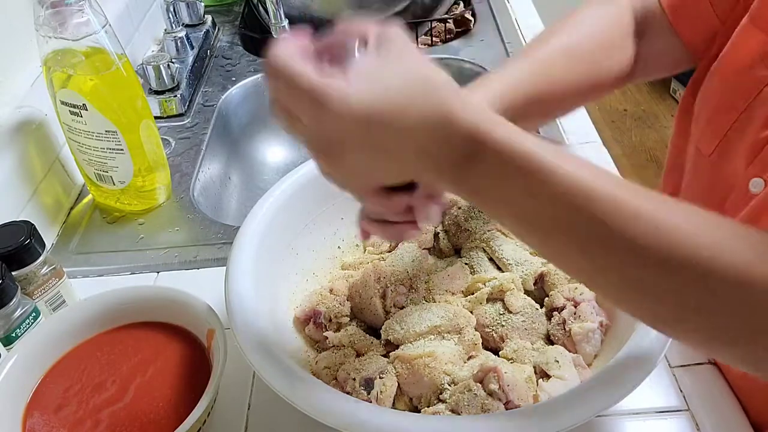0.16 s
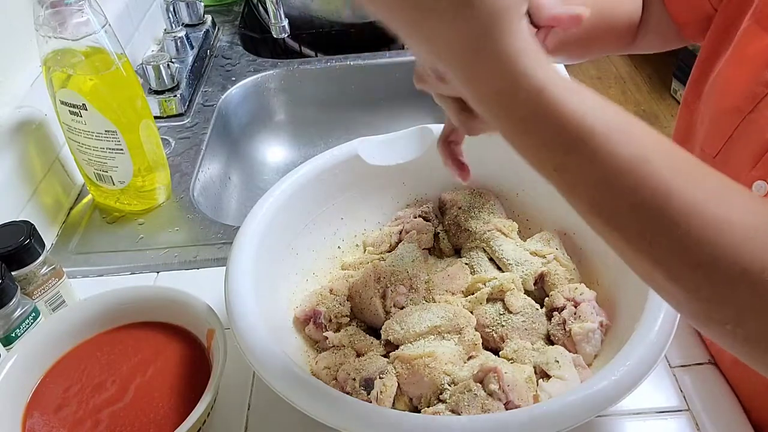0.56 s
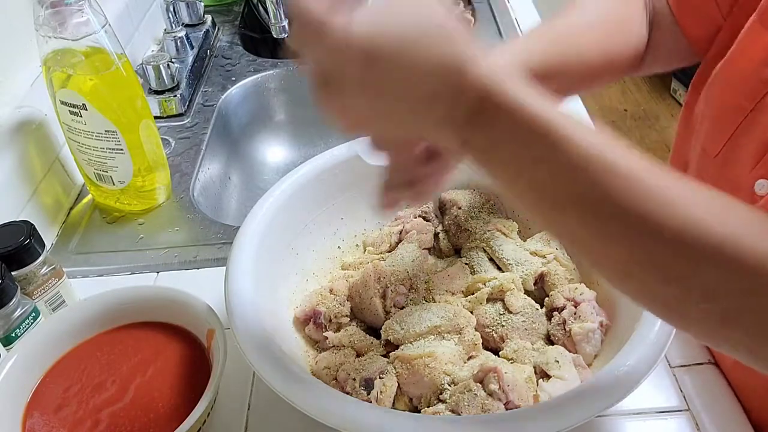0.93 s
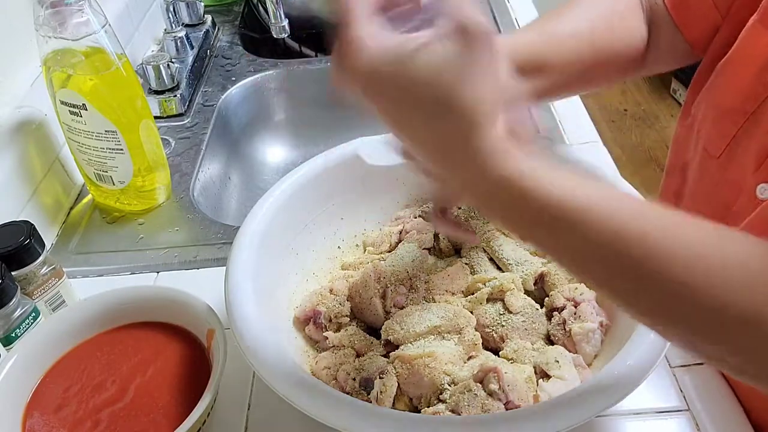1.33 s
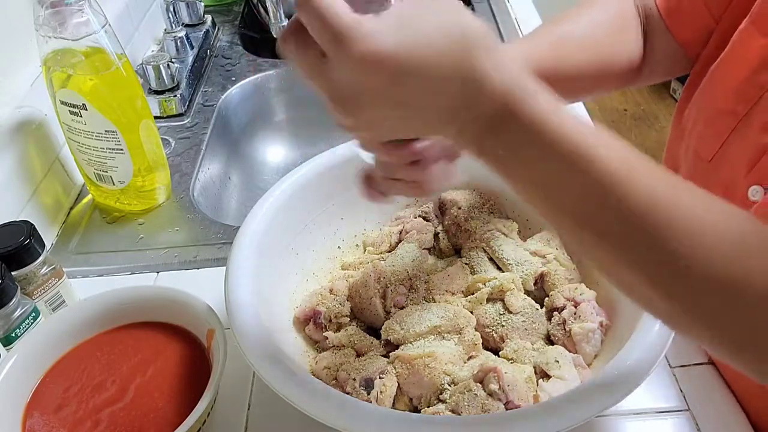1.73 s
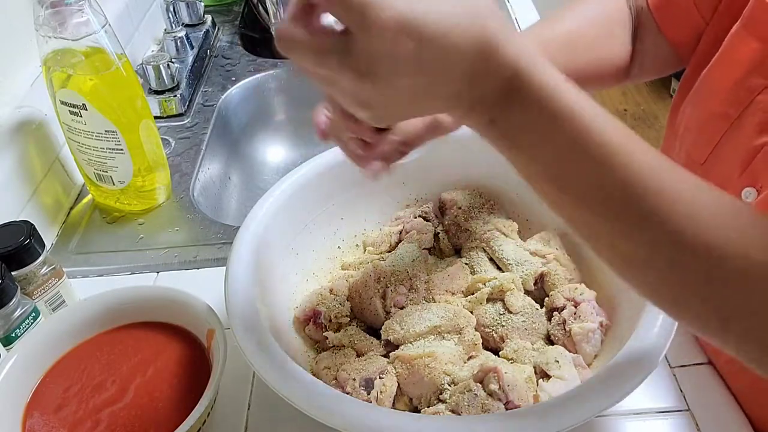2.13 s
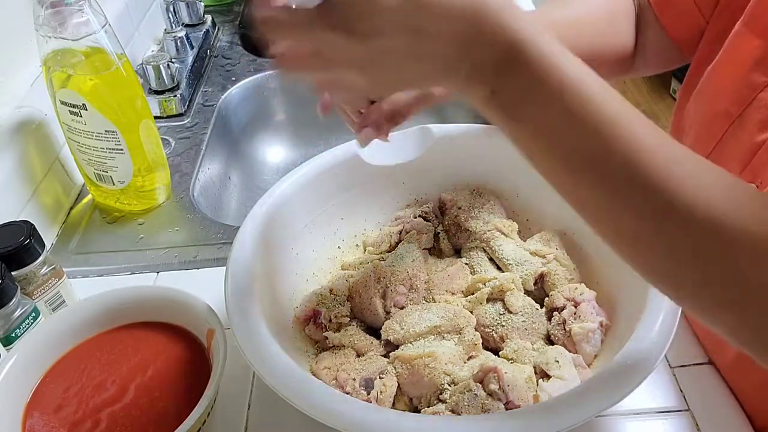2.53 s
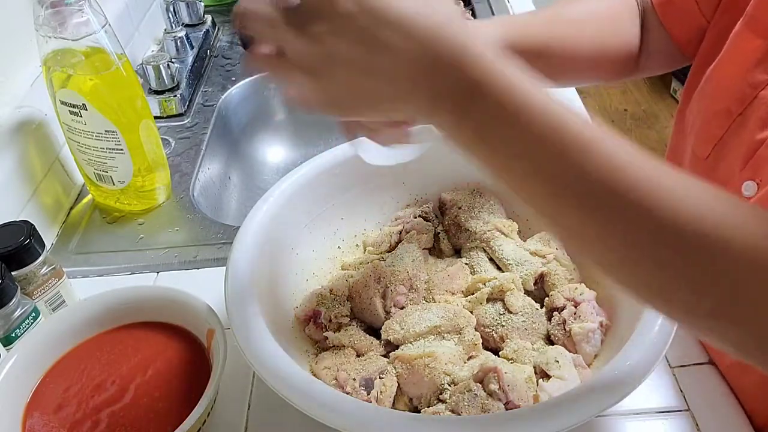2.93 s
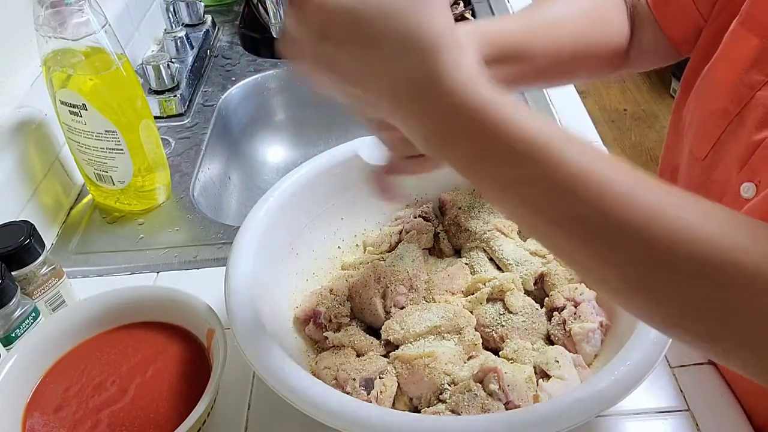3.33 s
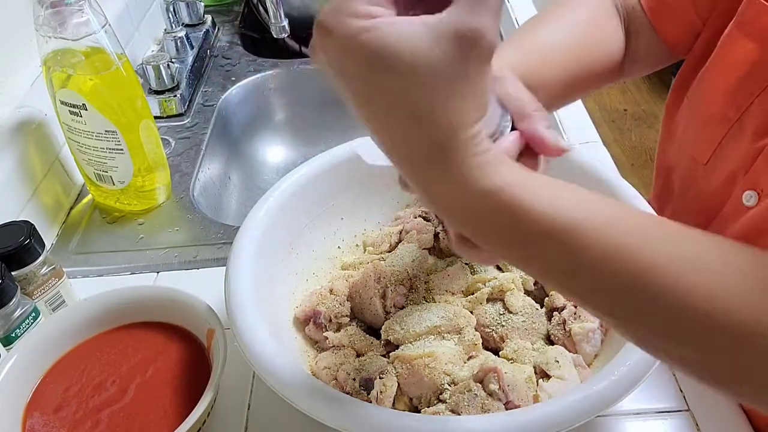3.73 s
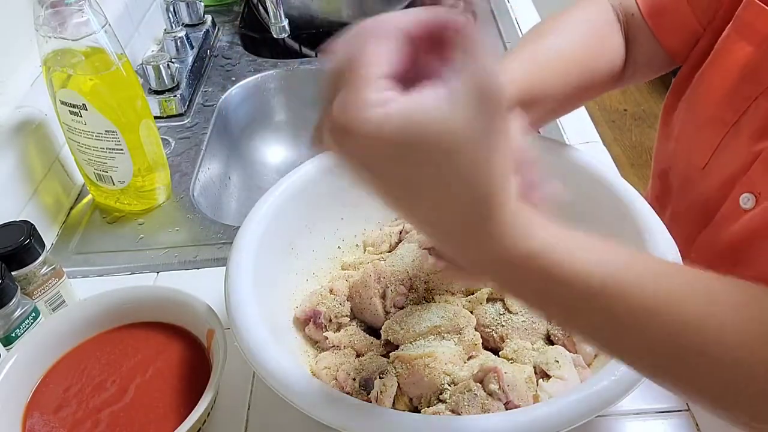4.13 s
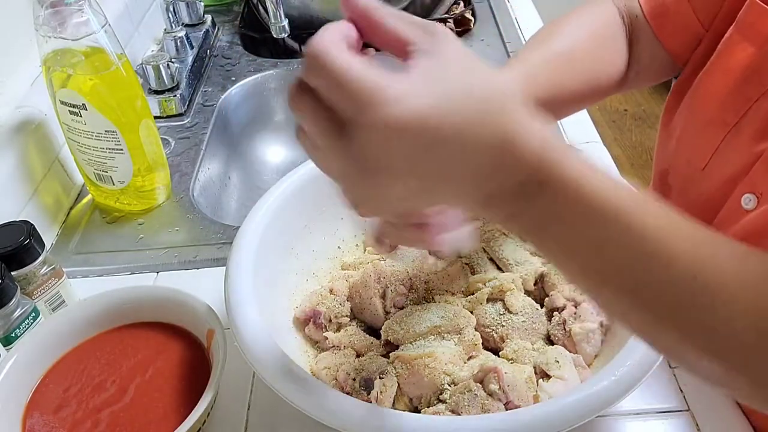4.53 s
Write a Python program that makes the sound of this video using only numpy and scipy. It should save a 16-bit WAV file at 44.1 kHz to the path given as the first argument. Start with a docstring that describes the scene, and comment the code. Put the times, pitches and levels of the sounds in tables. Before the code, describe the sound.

Two hands twist a spice grinder about twice a second, crunching grains between sharp clicks, while an appliance hums.

```python
"""Coarse grains crack in a seasoning grinder, twisted by two hands over a bowl of raw chicken.
After a few scattered cracks the twisting runs at about two turns a second. The burr crunches and
cracks grains, which rings the grinder's body. Between turns the hand takes a new grip with a click,
and loose grains rush across the jar and back. A small tiled kitchen answers, over an appliance's hum."""
import sys
import numpy as np
from scipy import signal
from scipy.fft import rfft, irfft
from scipy.io import wavfile
from scipy.ndimage import map_coordinates

SR = 44100
rng = np.random.default_rng(int(sys.argv[2]) if len(sys.argv) > 2 else 0)


def generate_wav(signal):
    """Clip the signal to [-1, 1] and save it as 16-bit WAV at the path in sys.argv[1]."""
    frames = np.transpose(np.atleast_2d(signal))
    scaled = np.clip(frames, -1, 1) * 32767
    pcm = np.round(scaled).astype(np.int16)
    wavfile.write(sys.argv[1], SR, pcm)


N = 205933
T = np.arange(N) / SR

# Levels are relative, ahead of layer and room gains.
# appliance hum partials: f/Hz, level/dB
HUM_PARTIALS = [(59.6, -56), (119.3, -57), (238.8, -78), (357, -79)]
# appliance rumble: f/Hz, level/dB
RUMBLE_SPECTRUM = [(15, -23.5), (33, 3), (45, -16.5), (60, -5.5), (75, 1), (86, -10), (98, 5), (112, 7.5),
                   (124, 1.5), (135, -20), (160, -17.5), (300, -50)]
# room air: f/Hz, level/dB
AIR_SPECTRUM = [(100, -6), (230, -1), (380, 0), (600, -5), (1200, -11), (3000, -17), (6500, -27),
                (15000, -32)]
# grinder knocking on the hand: t/s, level/dB, f/Hz, t60/s
HAND_KNOCKS = [(0.131, -45.5, 267, 0.08), (0.983, -51.5, 272, 0.089), (2.724, -41.5, 296, 0.033),
               (2.729, -43, 383, 0.07)]
# fine seasoning trickling as the grinder moves: t/s, level/dB
TRICKLE_CURVE = [(0, -63), (.5, -72), (.65, -90), (1.22, -65), (1.35, -52.5), (4.67, -48)]
# seasoning shifting as the jar is tipped or jolted: t/s, level/dB, length/s
JAR_JOLTS = [(0.083, -49, 0.059), (0.338, -54, 0.11), (0.85, -70.5, .06), (0.935, -50.5, 0.08),
             (1.088, -46, 0.025), (1.514, -32.5, 0.0068)]
# sliding grains: f/Hz, level/dB
SLIDE_SPECTRUM = [(300, -28.5), (900, -24), (1800, -15.5), (2600, -12.5), (3400, 0), (5000, -1.5),
                  (7000, 2), (9000, -3), (12000, -1.5), (15500, -7.5)]
# new grips: t/s, click/dB, click brightness/dB, rush across/dB, its length/s, rush back/dB
GRIPS = [(1.5, -28, -6, -43.5, 0.093, -41.5), (1.9816, -26, -5, -45, 0.11, -42),
         (2.4389, -14.5, -5.5, -39.5, 0.042, -40.5), (2.8973, -19.5, -14, -42.5, 0.068, -39.5),
         (3.359, -24, -20, -40, 0.091, -39.5), (3.837, -27, 1, -42, 0.098, -39),
         (4.3052, -16, -2, -42.5, 0.091, -39)]
# grinder body modes: f/Hz, level/dB, t60/s
BODY_MODES = [(1215, 5.5, 0.0474), (1842, 4.5, 0.029), (2076, -27, 0.053), (3047, 3.5, 0.12),
              (3250, 9.5, 0.022), (3620, -16.5, 0.08), (3620, 0.5, 0.04), (3830, -19, 0.09),
              (4070, -1, 0.047), (4580, 3, 0.055), (4685, -8, 0.13), (5890, -17.5, 0.043),
              (6310, -17, 0.031), (6580, -0.5, 0.038)]
# burr biting on each forward twist: t/s, level/dB
BITES = [(1.318, -48.5), (1.77, -48), (2.234, -47), (2.70, -46.5), (3.153, -44.5), (3.622, -44.5),
         (4.094, -45.5), (4.577, -42)]
# finer grains being crushed: f/Hz, level/dB
CRUNCH_SPECTRUM = [(150, -25), (300, -12), (620, -16), (1080, -3.5), (1500, -6.5), (1850, 8.5), (2500, -3),
                   (3300, 6), (5000, 0), (8000, -5), (15000, -38)]
# coarse grains cracking: t/s, level/dB, brightness/dB, crumble t60/s
GRAIN_CRACKS = [(0.1195, -27, 1, 0.043), (0.1312, -9.5, 0, 0.028), (0.1409, -18, 10, .03),
                (0.9177, -44.5, 13, 0.027), (0.9804, -8, 2, 0.077), (1.0012, -14.5, -2.5, 0.049),
                (1.2544, -28, 1, 0.098), (1.3044, -19, 7, 0.015), (1.747, -28, -11, 0.054),
                (1.8208, -19, -7.5, 0.019), (2.2428, -19, 5, 0.012), (2.305, -20.5, -4.5, 0.1),
                (2.689, -13, 4.5, 0.016), (2.706, -21.5, -13, 0.023), (2.7599, -13.5, -1, 0.064),
                (3.1508, -21, -7.5, 0.0095), (3.168, -21, -1, .03), (3.2338, -19, 4, 0.0093),
                (3.2511, -25, -34.5, 0.014), (3.6193, -15.5, 3.5, 0.017), (4.0018, -36, 23.5, .024),
                (4.0948, -18.5, -11, 0.029), (4.1324, -20.5, -4, 0.026), (4.165, -13, -1.5, 0.034),
                (4.268, -32.5, -23, 0.074), (4.5812, -17, -10, 0.019), (4.6123, -12, 2, 0.013)]


def amp(db):
    return 10 ** (np.asarray(db) / 20)


def unit_energy(x):
    return x / np.sqrt(np.sum(x ** 2, axis=-1, keepdims=True))


def fade(t, t60_s):
    return np.exp(-np.log(1000) * t / max(t60_s, 1e-3))


def add(track, at_s, sound):
    start = int(at_s * SR)
    track[start:start + len(sound)] += sound[:N - start]


def colour(x, spectrum):
    """Filter by (f/Hz, level/dB) rows; rms 1."""
    hz, db = np.transpose(spectrum)
    bins_hz = np.maximum(np.fft.rfftfreq(N, 1 / SR), 1)
    shaped = irfft(rfft(x) * amp(np.interp(np.log(bins_hz), np.log(hz), db)), N)
    return shaped / np.sqrt(np.mean(shaped ** 2))


def band(x, lo_hz, hi_hz, order=2):
    """Causal band-pass; energy 1."""
    sos = signal.butter(order, [lo_hz, hi_hz], "band", fs=SR, output="sos")
    return unit_energy(signal.sosfilt(sos, x))


def walk(rate_hz):
    """Gaussian values joined by straight lines."""
    return np.interp(T * rate_hz, np.arange(N), rng.standard_normal(N))


def grains(rate_hz, spread_db, size=N):
    """Clicks at random times, many weak, few strong."""
    lands = rng.random(size) < rate_hz / SR
    strength = amp(spread_db * np.minimum(rng.exponential(size=size), 4))
    return lands * strength * rng.choice([-1, 1], size)


def swells(rows, rise_share, fall_s):
    """Rise-hold-decay gains from (t/s, level/dB, length/s) rows, summed in power."""
    power = np.zeros(N)
    for at_s, db, length_s in rows:
        t = T[:int((length_s + 6 * fall_s) * SR)]
        rise = np.minimum(t / (rise_share * length_s), 1)
        fall = np.exp(-np.maximum(t - length_s, 0) / fall_s)
        add(power, at_s, (amp(db) * rise * fall) ** 2)
    return np.sqrt(power)


def moving_convolve(x, response, size=4096):
    """Moving source: a fresh impulse response for each overlapping frame."""
    window = signal.get_window("hann", size)
    out = np.zeros((len(response()), N))
    for start in range(0, N, size // 2):
        frame = x[start:start + size]
        wet = signal.fftconvolve((frame * window[:len(frame)])[None], response())
        out[:, start:start + wet.shape[1]] += wet[:, :N - start]
    return out


def pan(left_over_right_db):
    return amp(np.array([[left_over_right_db], [-left_over_right_db]]) / 2)


def background(rumble_db=-48.5, air_db=-65, air_width=0.99):
    """An appliance motor hums and rumbles, slightly left, over faint room air."""
    hum = sum(np.sqrt(2) * amp(db + walk(rate_hz=3.13)) * np.sin(2 * np.pi * (hz * T + rng.random()))
              for hz, db in HUM_PARTIALS)
    rumble = amp(rumble_db) * colour(rng.standard_normal(N), RUMBLE_SPECTRUM)
    air = colour(rng.standard_normal(N) + air_width * rng.standard_normal((2, N)), AIR_SPECTRUM)
    return (hum + rumble) * pan(2) + amp(air_db) * air


def kitchen(x, direct_db=-3, early_db=-1, late_db=-12, right_lag_s=95e-6, size=14000):
    """Sound arrives left first; moving hands and bowl scatter it, then the walls."""
    t = T[:size]
    lag_s = right_lag_s * (1 + 0.48 * walk(rate_hz=5.037))  # grinder swings side to side
    direct = np.array([x, map_coordinates(x, [(T - lag_s) * SR], order=5)])
    early = amp(early_db) * unit_energy(fade(t, t60_s=0.11))
    late = amp(late_db) * unit_energy(fade(t, t60_s=0.4) * np.minimum(t / 0.01, 1))
    decay = np.hypot(early, late)
    echoes = moving_convolve(x, lambda: decay * rng.standard_normal((2, size)))
    return (amp(direct_db) * direct + echoes) * pan(2.5)


def knocks():
    """Low rings, damped at once by the hand."""
    out, t = np.zeros(N), T[:8192]
    for at_s, db, hz, t60_s in HAND_KNOCKS:
        add(out, at_s, amp(db) * np.sin(2 * np.pi * hz * t) * fade(t, t60_s))
    return out


def flow(wall_hits, across_delay_s=0.0047, settle_db=-6.5, settle_s=0.12, sift_db=-29, sift_s=0.14):
    """Gain of sliding seasoning: rush and settling per grip, sifting per twist, jolts, trickle."""
    rushes = [(s + across_delay_s, db, length_s) for s, _, _, db, length_s, _ in GRIPS]
    across = swells(rushes, rise_share=0.21, fall_s=0.01)
    run_ons = [(s, db + settle_db, settle_s) for s, db in wall_hits]
    settling = swells(run_ons, rise_share=0.15, fall_s=0.018)
    sifts = [(s, sift_db + 0.54 * db, sift_s) for s, db in BITES]  # harder twists shed more
    sifting = swells(sifts, rise_share=0.086, fall_s=0.024)
    jolts = swells(JAR_JOLTS, rise_share=0.4, fall_s=0.01)
    trickle = amp(np.interp(T, *np.transpose(TRICKLE_CURVE)))
    return np.sqrt(across ** 2 + settling ** 2 + sifting ** 2 + jolts ** 2 + trickle ** 2)


def slide(gain_db=3.5, back_delay_s=0.1454, back_s=0.021, tilt_db_per_oct=2):
    """Loose grains hiss over each other, brighter where they rush back against the jar wall."""
    running = grains(rate_hz=7000, spread_db=3) * amp(2.8 * walk(rate_hz=80))
    wall_hits = [(s + back_delay_s, db) for s, *_, db in GRIPS]
    sliding = colour(running, SLIDE_SPECTRUM) * flow(wall_hits)
    back = swells([(s, db, back_s) for s, db in wall_hits], rise_share=0.22, fall_s=0.017)
    wall_spectrum = [(hz, db + tilt_db_per_oct * np.log2(hz)) for hz, db in SLIDE_SPECTRUM]
    striking = colour(grains(rate_hz=5000, spread_db=4), wall_spectrum) * back
    return (sliding + striking) * amp(gain_db)


def body(x, ring_db=-14, vary_db=3):
    """The body passes each click on and rings; the mode mix varies with the spot struck."""
    t = T[:4096]
    modes = np.array([amp(db) * np.sin(2 * np.pi * hz * t) * fade(t, t60_s)
                      for hz, db, t60_s in BODY_MODES])

    def ring():
        shape = (1, len(BODY_MODES))
        weights = amp(vary_db * rng.standard_normal(shape)) * rng.choice([-1, 1], shape)
        return unit_energy(weights @ modes)

    return x + amp(ring_db) * moving_convolve(x, ring)[0]


def crunch(gain_db=6.5, lead_s=0.06, twist_s=0.16):
    """The burr crushes grains in fits and starts; load builds from just before each bite."""
    crushed = grains(rate_hz=1700, spread_db=4.5) * amp(2 * walk(rate_hz=110))
    load = swells([(s - lead_s, db, twist_s) for s, db in BITES], rise_share=0.66, fall_s=0.022)
    return colour(crushed, CRUNCH_SPECTRUM) * load * amp(gain_db)


def cracks(gain_db=9, low_db=-21, mid_db=-12, treble_db=-15.5, snap=0.18, rise_s=0.0024, size=6144):
    """Grain cracks and grip clicks: one snap, then a fast-thinning spray of fragments."""
    out, t = np.zeros(N), T[:size]
    click_t60_s = 0.017
    clicks = [(s, db, bright_db, click_t60_s) for s, db, bright_db, *_ in GRIPS]
    for at_s, db, bright_db, t60_s in GRAIN_CRACKS + clicks:
        fragments = grains(rate_hz=16000, spread_db=2, size=size)
        burst = unit_energy(fragments * fade(t, t60_s) * np.minimum(t / rise_s, 1))
        burst[0] += snap
        # big grains shake the housing and sound low; small ones spit treble
        low = amp(low_db - 0.45 * bright_db) * band(burst, 1550, 2350, order=1)
        mid = amp(mid_db) * band(burst, 2750, 5800)
        treble = amp(treble_db + bright_db) * band(burst, 5800, 14000)
        add(out, at_s, amp(db + gain_db) * (low - mid + treble) * np.sqrt(SR / 1000))
    return out


def scene():
    """Grinder in the kitchen, over the appliance."""
    grinder = body(cracks() + crunch()) + slide() + knocks()
    return kitchen(grinder) + background()


def record(dry):
    """Steep low-pass at 15.8 kHz."""
    return signal.sosfilt(signal.ellip(10, 0.2, 70, 15800, fs=SR, output="sos"), dry)


dry = scene()
out = record(dry)
generate_wav(out)
```